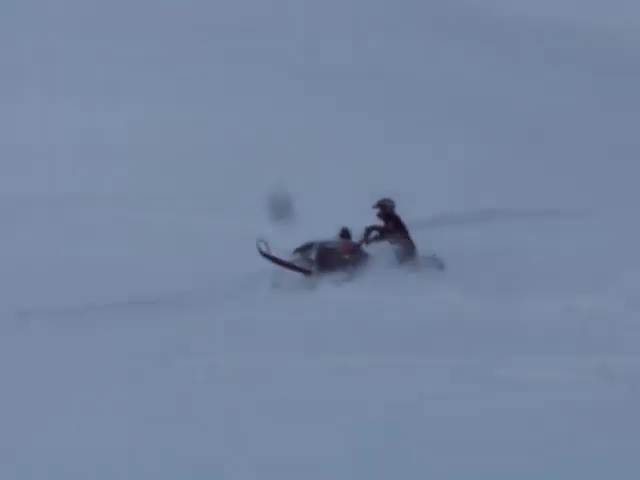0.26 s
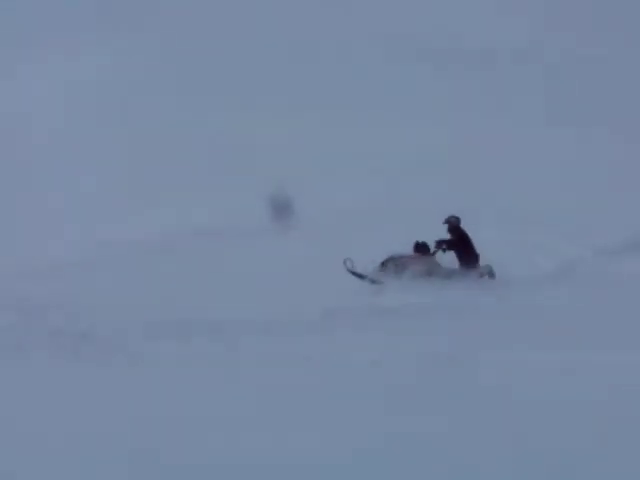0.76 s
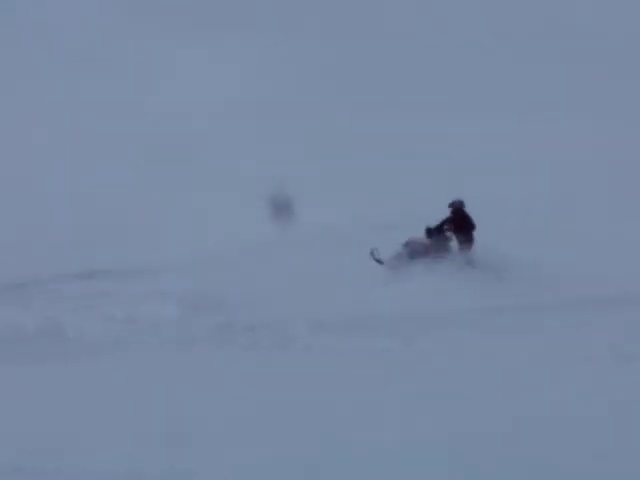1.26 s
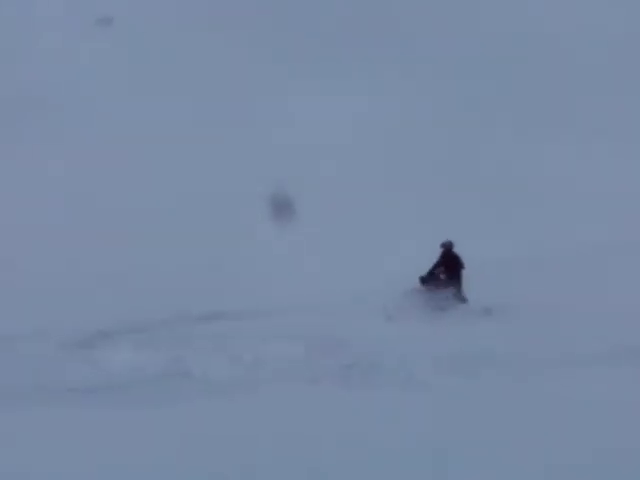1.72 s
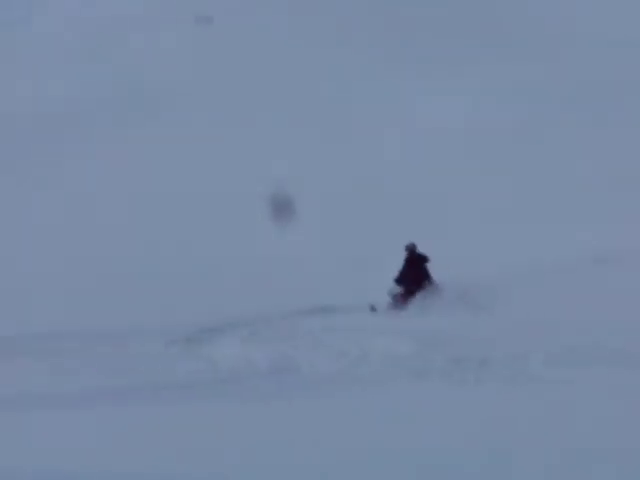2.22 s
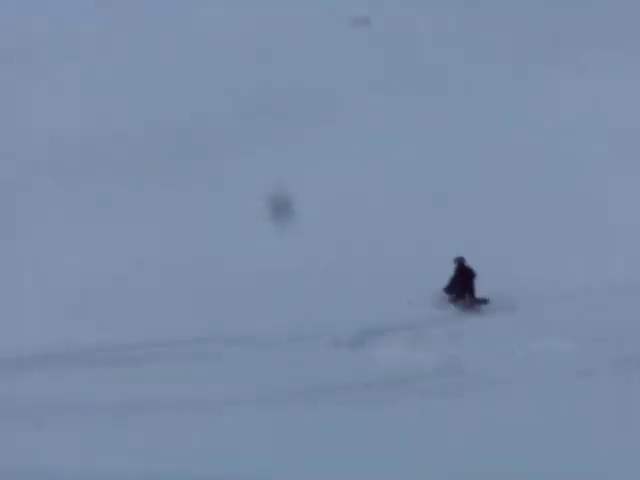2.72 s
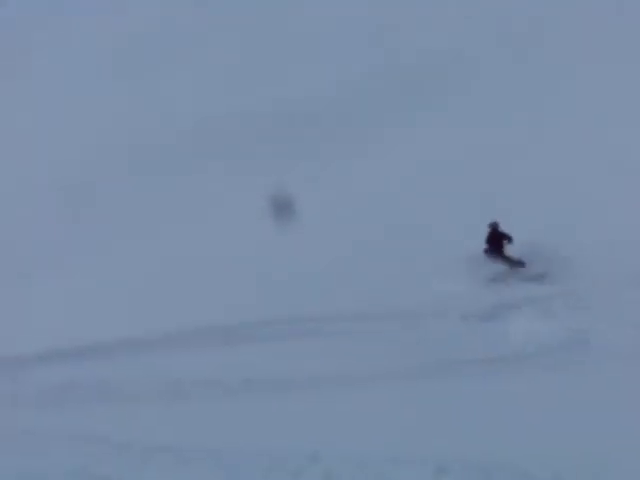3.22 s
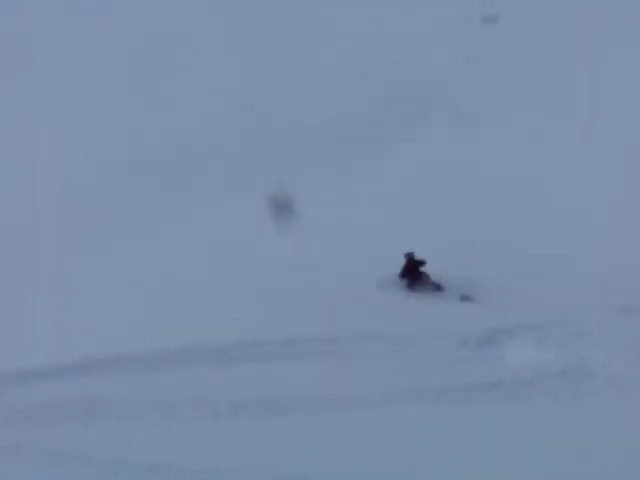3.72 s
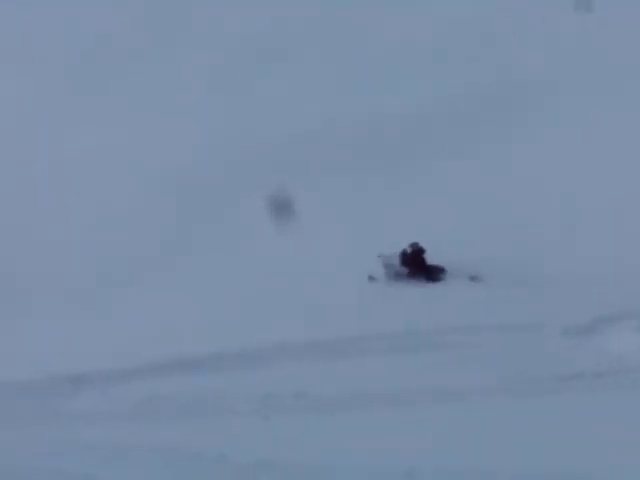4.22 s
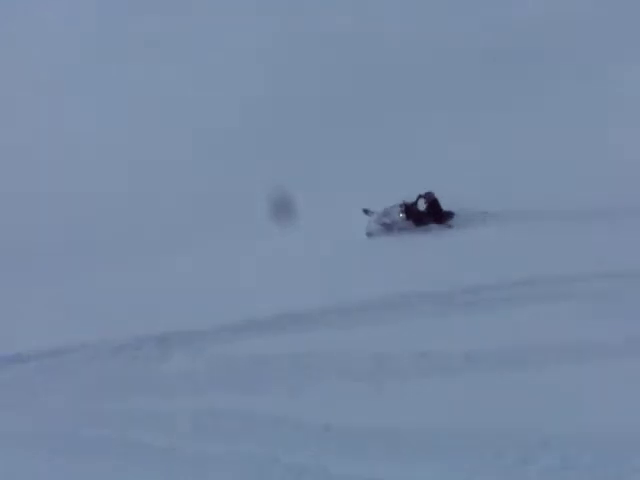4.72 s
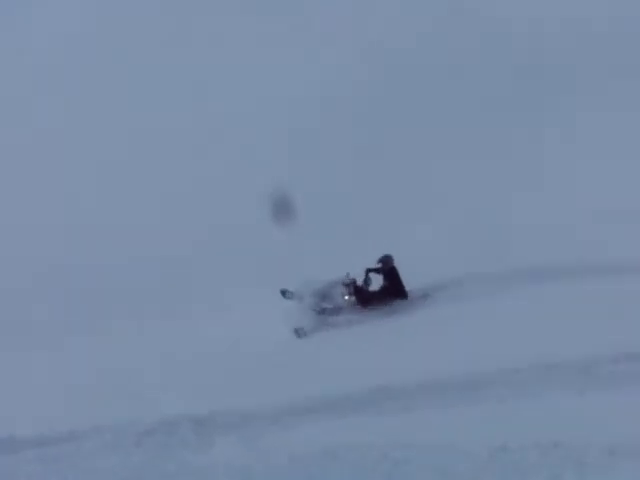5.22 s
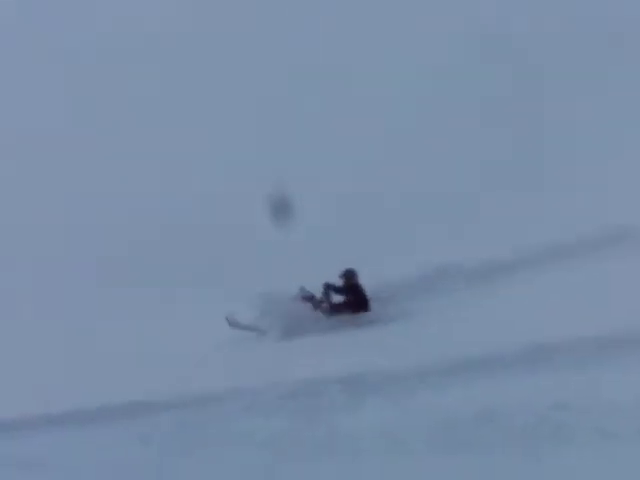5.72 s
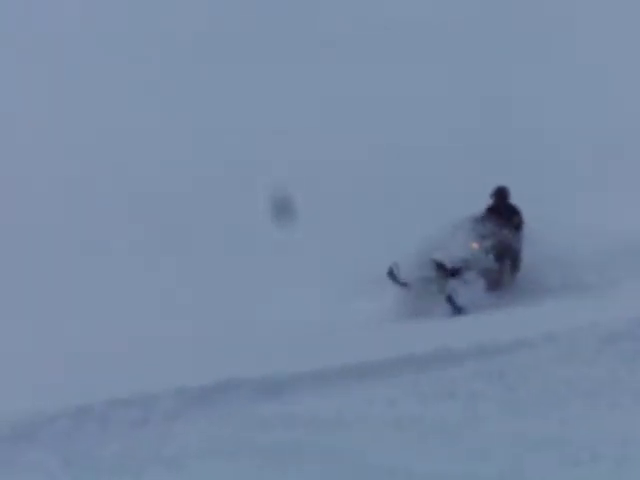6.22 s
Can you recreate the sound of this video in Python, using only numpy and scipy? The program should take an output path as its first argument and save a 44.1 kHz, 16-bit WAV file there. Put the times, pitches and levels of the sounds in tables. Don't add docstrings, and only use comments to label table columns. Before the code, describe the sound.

Raspy twin-cylinder sled engine screams and sags as the throttle opens and shuts, with track whine, hissing snow spray and light handling bumps outdoors.

```python
import sys
import numpy as np
from scipy import signal
from scipy.fft import rfft, irfft, next_fast_len
from scipy.io import wavfile
from scipy.ndimage import uniform_filter1d

SR = 44100
rng = np.random.default_rng(int(sys.argv[2]) if len(sys.argv) > 2 else 0)


def natural_amplitude(level_db):
    exponent = np.asarray(level_db, float) / 20
    return 10 ** exponent


def wav_out(sig):
    wavfile.write(sys.argv[1], SR, np.round(np.clip(np.atleast_2d(sig).T, -1, 1) * 32767).astype(np.int16))


N = 284886


def rms_one(x):
    return x / np.sqrt(np.mean(x ** 2) + 1e-20)


def in_time(rows):
    s, *columns = np.transpose(rows)
    return [np.interp(np.arange(N) / SR, s, c) for c in columns]


def at_hz(points, hz):
    point_hz, db = np.transpose(points)
    return np.interp(np.log(hz + 1), np.log(point_hz), db)


def drift(rate):
    r = np.exp(-128 * np.pi * rate / SR)
    slow = signal.lfilter([1], [1, -2 * r, r * r], rng.standard_normal(N // 64 + 1002))
    slow = slow[1000:]
    return np.interp(np.arange(N) / 64, np.arange(len(slow)), rms_one(slow))


def colour(x, db_of_hz):
    size = next_fast_len(N + 8192)
    hz = np.arange(size // 2 + 1) * SR / size
    cepstrum = irfft(db_of_hz(hz) * np.log(10) / 20, size)
    cepstrum[1:size // 2] *= 2
    cepstrum[size // 2 + 1:] = 0
    return irfft(rfft(x, size) * np.exp(rfft(cepstrum)), size)[..., :N]


def crank_hz():
    # start_s, aim_hz
    throttle = [(0, 121.9), (0.522, 131.4), (.7, 112.1), (0.899, 116), (1.0, 124.5), (1.15, 127.9),
                (1.419, 122.7), (1.7, 118.2), (1.99, 35.38), (2.18, 128), (2.3, 141.2), (2.409, 138.3),
                (2.635, 45.93), (2.91, 77.5), (2.98, 100.2), (3.07, 61.63), (3.22, 133.4), (3.35, 153.6),
                (3.55, 144), (3.72, 124.6), (3.89, 115.6), (4.06, 121.7), (4.2, 131.1), (4.595, 53.07),
                (4.751, 126), (5.05, 141.6), (5.31, 139), (5.66, 125.5), (5.84, 106.4), (6.1, 130),
                (6.21, 152.8), (6.375, 70)]
    start_hz, lag_s = 123.5, .35
    s, aim_hz = np.transpose(throttle)
    aim = aim_hz[np.searchsorted(s, np.arange(N) / SR, side="right").clip(1) - 1]
    keep = np.exp(-1 / (lag_s * SR))
    return signal.lfilter([1 - keep], [1, -keep], aim, zi=[keep * start_hz])[0]


def closed_throttle_db(speed_hz):
    delay_s, depth_db, fade_s = .025, 11, .02
    slowing = -uniform_filter1d(np.gradient(speed_hz) * SR, size=900)
    shut = np.clip((slowing - 55) / 35, 0, 1)
    shut_db = depth_db * np.minimum(shut, np.roll(shut, round(delay_s * SR)))
    return uniform_filter1d(shut_db, size=round(fade_s * SR))


def order_levels(speed_hz, off_pipe_hz, swing_db, facing):
    # order, level_db at mean effort, share of the effort's swing, facing_gain_db
    main_orders = [
        (2, -53, 0.21, 5),
        (4, -50, 0.33, 0.5),
        (6, -45, 1.44, 3),
        (8, -41.5, 1.2, -7),
        (10, -38.5, 0.78, -3.5),
        (14, -43.5, 1.34, 4),
        (7, -45, 1.4, -2.5),
    ]
    # start_s, length_s, order, level_db
    singing = [(0, .3, 6, -29.5), (0.596, 0.19, 6, -24), (1.564, 0.075, 6, -31), (1.905, 0.075, 6, -33.5),
               (2.528, 0.059, 6, -35), (3.573, 0.4, 6, -25), (3.997, .25, 6, -29.5), (4.276, 0.29, 6, -19),
               (4.95, 0.36, 6, -31), (5.799, 0.097, 6, -36), (6.27, 0.13, 6, -30), (0, 0.67, 7, -33.5),
               (0.596, 0.12, 7, -28), (0.802, .35, 7, -36), (2.547, 0.066, 7, -39), (3.601, .1, 7, -38),
               (5.396, 0.29, 7, -38.5), (1.351, 0.35, 10, -32.5), (5.547, 0.23, 8, -41.5),
               (5.986, 0.32, 10, -37), (1.256, .75, 7, -27.5), (4.354, 0.14, 7, -29),
               (5.154, .17, 7, -33.5), (1.274, 0.36, 8, -30.5), (2.222, 0.078, 8, -32.5),
               (4.338, 0.25, 8, -27), (4.745, 0.1, 8, -34), (5.2, 0.1, 8, -32.5), (6.321, 0.042, 8, -34),
               (0.22, 0.45, 10, -32), (0.8, 0.46, 10, -30), (4.243, 0.29, 10, -34), (4.905, .33, 10, -32.5),
               (0.83, 0.4, 14, -29), (1.208, 0.62, 14, -26), (4.298, 0.37, 14, -30.5),
               (5.093, 0.093, 14, -33), (5.95, .27, 6, -43), (4.162, 0.713, 4, -41.5),
               (5.29, 0.496, 2, -41.5)]
    t, out = np.arange(N) / SR, []
    for order, db, share, facing_db in main_orders:
        if order % 2:
            db_per_hz = .2
        else:
            db_per_hz = -.2 * (order > 2)
        pipe_db = db_per_hz * np.clip(off_pipe_hz, 0, 25.0)
        level = db + share * swing_db + facing_db * facing + pipe_db + 1.2 * drift(4.6)
        flutter_db = 1.67 * drift(8.0)
        for s, length, sung, sung_db in singing:
            if sung == order:
                outside_s = np.maximum(np.maximum(s - t, t - s - length), 0)
                level = np.maximum(level, sung_db - 150 * outside_s + flutter_db)
        out.append(level)
    return out


def howl(turns, anchors_db, odd_db, top_db, shut_db, idle_db, off_pipe_hz):
    # order, trim_db
    order_trim = [(1, -17.5), (3, -10), (5, -16), (9, -10), (11, -9), (12, -5), (13, -7.5), (15, -5),
                  (16, -6.5), (17, -4.5), (18, -7), (19, -9.5), (23, -7), (30, -8), (45, -16), (59, -23.5)]
    # peak_s, order, level_db, length_s
    streaks = [(0.39, 16, -29.5, 0.14), (0.55, 23, -27.5, 0.12), (.9, 23, -26, 0.084),
               (1.3, 15, -32, 0.069), (3.52, 13, -32.5, 0.045), (2.47, 15, -33, 0.1), (3.68, 16, -32, 0.12),
               (3.82, 22, -32, .09), (5.3, 14, -34, 0.16), (5.57, 12, -40, 0.4), (4.44, 5, -41.5, 0.38),
               (6.217, 16, -33, 0.083), (1.061, 3, -54, 0.26), (2.4, 11, -41.5, 0.11), (4.07, 3, -51, 0.26),
               (5.58, 5, -41, 0.28), (4.25, 5, -46, 0.11), (5.3, 16, -36, 0.18), (1.2, 16, -30, 0.087),
               (1.2, 13, -36, 0.21), (5.25, 6, -30.5, 0.1), (3.35, 8, -35.5, 0.054), (5.62, 8, -37.5, 0.11),
               (3.5, 15, -35.5, 0.06), (3.5, 9, -36.5, .12), (2.21, 10, -38.5, 0.18), (6.15, 10, -41, 0.15),
               (0.67, 4, -45, 1.55), (6.3, 12, -37.5, 0.07), (0.077, 16, -37.5, 0.16),
               (0.43, 9, -33.5, 0.18), (.5, 13, -38.5, 0.23), (0.48, 18, -33, 0.068), (.9, 15, -31, 0.16),
               (.95, 11, -34, 0.13), (0.51, 20, -29, 0.12), (1.45, 11, -32.5, 0.27), (2.4, 9, -38, 0.17),
               (3.42, 11, -37, 0.16), (4.15, 20, -33.5, .07), (4.25, 11, -35, .08), (1.7, 23, -36.5, 0.16),
               (5.95, 16, -45, .12), (6.05, 11, -43.5, .15), (5.86, 20, -36.5, 0.05),
               (5.85, 14, -37, 0.066), (5.45, 13, -41, .08), (5.8, 11, -36.5, 0.092), (3.64, 20, -32, 0.06),
               (2.6, 14, -34.5, 0.059),
               (0.049, 8, -42, 0.05), (0.519, 14, -39.5, 0.09), (0.65, 8, -36.0, 0.18),
              (0.69, 12, -40.5, 0.08), (0.93, 13, -36, 0.13), (1.15, 12, -40, 0.074),
              (1.164, 10, -39, 0.06), (1.31, 13, -37.5, 0.05), (1.553, 7, -36.0, 0.056),
              (1.618, 13, -37.5, 0.09), (1.81, 12, -42.5, 0.08), (2.04, 8, -39, 0.09),
              (2.27, 11, -46, 0.087), (2.29, 9, -45.6, 0.08), (2.43, 13, -43.5, 0.13), (2.46, 8, -44, 0.09),
              (2.59, 12, -48, 0.08), (3.85, 10, -38.5, 0.089), (4.08, 9, -40, 0.11), (4.33, 11, -40.3, 0.1),
              (4.398, 10, -33.5, 0.09), (4.49, 4, -41, 0.11), (4.51, 8, -33.5, 0.073),
              (4.51, 14, -37, 0.08), (4.84, 12, -47, 0.09), (4.869, 13, -39, 0.1), (5.02, 9, -44, 0.12),
              (5.21, 11, -39.2, 0.16), (5.208, 9, -44, 0.1), (5.279, 7, -41, 0.083), (5.33, 12, -37.5, 0.1),
              (5.46, 11, -46, 0.12), (5.45, 8, -44, 0.08), (5.53, 6, -36.5, 0.13), (5.8, 12, -44.0, 0.09),
              (5.87, 10, -46, 0.07), (6.22, 7, -45.8, 0.25), (6.27, 11, -43.5, 0.1),
              (6.418, 6, -45.5, 0.06),
               (0.04, 26, -41.5, 0.044), (0.11, 18, -43.5, 0.15), (0.16, 29, -38.7, 0.17),
              (0.192, 15, -37.5, 0.13), (0.19, 23, -39.5, 0.1), (0.19, 26, -41, 0.074),
              (0.362, 30, -37.5, 0.12), (0.391, 15, -36, 0.08), (0.471, 19, -36.5, 0.18),
              (0.51, 34, -38.5, 0.13), (0.48, 38, -38, 0.09), (0.5, 28, -40, 0.12),
              (0.652, 35, -34.5, 0.13), (0.682, 18, -37.4, 0.083), (0.69, 20, -39.5, 0.08),
              (0.752, 15, -42.5, 0.08), (0.88, 24, -40, 0.09), (0.891, 36, -39.5, 0.1),
              (0.929, 32, -36.5, 0.09), (1.04, 39, -32, 0.21), (0.98, 15, -37, 0.06),
              (1.01, 29, -34.5, 0.1), (1.15, 31, -33.5, 0.1), (1.22, 20, -37.3, 0.12),
              (1.32, 23, -37, 0.09), (1.43, 29, -38.9, 0.12), (1.42, 15, -34.5, 0.09),
              (1.44, 17, -41.5, 0.09), (1.599, 33, -40.5, 0.17), (1.691, 18, -34.5, 0.21),
              (1.68, 20, -42, 0.17), (1.651, 29, -39, 0.1), (1.71, 24, -41.3, 0.1),
              (1.837, 37, -35.5, 0.08), (1.89, 23, -41.5, 0.08), (1.971, 20, -44.5, 0.1),
              (2.25, 19, -49.5, 0.1), (2.436, 26, -38, 0.12), (2.51, 16, -39.5, 0.11),
              (2.67, 15, -45.5, 0.1), (3.39, 17, -43, 0.16), (3.44, 16, -45, 0.09), (3.8, 26, -41.4, 0.1),
              (3.85, 16, -45, 0.08), (4.301, 23, -41.5, 0.1), (4.372, 16, -38.5, 0.13),
              (4.521, 23, -41, 0.09), (4.901, 18, -37.5, 0.12), (5.0, 17, -43.5, 0.27),
              (5.02, 16, -42, 0.14),
               (.96, 43, -37, .08),
        (1.0, 44, -39, .1),
        (1.1, 42, -39, .07),
        (1.12, 35, -37, .05),
        (3.75, 14, -38, .12),
        (5.12, 24, -39, .08),
        (5.6, 12, -40, .12),
        (6.08, 20, -44, .19),
        (6.06, 15, -46, .14),
        (6.29, 15, -42, .12),
    ]
    # deepest_s, order, depth_db, length_s
    lulls = [(0.049, 23, 7.5, 0.05), (0.048, 25, 5.6, 0.056), (0.14, 14, 9.5, 0.099),
             (0.159, 27, 11.2, 0.08), (0.319, 8, 10.5, 0.17), (0.49, 17, 7.5, 0.12), (0.53, 18, 5.5, 0.07),
             (0.61, 11, 3.5, 0.12), (0.63, 22, 7, 0.07), (0.72, 10, 5, 0.1), (0.78, 25, 6, 0.18),
             (0.72, 17, 5.5, 0.08), (0.94, 21, 8, 0.2), (1.05, 25, 8, 0.14), (1.08, 15, 5, 0.08),
             (1.18, 7, 5.5, 0.08), (1.27, 16, 2, 0.07), (1.461, 6, 7.9, 0.16), (1.441, 10, 6, 0.1),
             (1.449, 9, 13.5, 0.13), (1.548, 16, 4, 0.14), (1.69, 23, 4, 0.07), (1.76, 15, 10.5, 0.16),
             (1.77, 17, 6, 0.19), (1.86, 11, 8.7, 0.13), (1.93, 12, 5, 0.07), (2.408, 10, 5.5, 0.062),
             (2.43, 18, 7, 0.07), (2.45, 24, 4.5, 0.1), (2.49, 23, 7, 0.1), (3.42, 11, 5, 0.06),
             (3.507, 6, 11.5, 0.07), (3.56, 13, 2.5, 0.06), (4.36, 12, 5.5, 0.18), (4.348, 13, 10.5, 0.12),
             (4.418, 17, 11.4, 0.2), (4.429, 15, 8.5, 0.19), (4.962, 6, 4.5, 0.066), (5.148, 12, 10, 0.11),
             (5.239, 14, 10, 0.064), (5.44, 10, 7.5, 0.094), (5.62, 8, 5.3, 0.11), (5.8, 11, 7, 0.08),
             (6.13, 10, 5, 0.09), (6.14, 16, 5.7, 0.06)]
    known, out, t = [2, 4, 6, 8, 10, 14, 18], np.zeros(N), np.arange(N) / SR
    levels = anchors_db + [top_db]
    jitter_turns = 0.0012 * (1 + .02 * np.maximum(off_pipe_hz, 0))
    wobble = jitter_turns * drift(27)
    contrast = np.clip(1 - .025 * off_pipe_hz, 0, 1)
    coarse = t[::64]
    for k in range(1, 60):
        place = np.interp(k, known, np.arange(7))
        below = min(int(place), 5)
        db = levels[below] + (place - below) * (levels[below + 1] - levels[below])
        if k % 2:
            db = db + np.clip(1.6 - abs(np.log2(k / 7)), 0, 1) * (odd_db - db)
        if k not in known[:6] + [7]:
            trim_db = np.interp(k, *np.transpose(order_trim))
            db = db + (contrast if 5 < k < 18 else 1) * trim_db
            waver_db = 2.2 * (1 + .03 * max(k - 16, 0))
            db = db + waver_db * drift(5 * (1 + max(k - 18, 0) / 8))
        open_db = -shut_db[::64] * (k > 4) - idle_db[::64] * (k > 2)
        lifts = 0
        for s, order, lift_db, length in streaks:
            if order == k:
                lifts = lifts + natural_amplitude(lift_db - 15.8 * ((coarse - s) / length) ** 2)
        for s, order, depth_db, length in lulls:
            if order == k:
                open_db = open_db - depth_db * np.exp(-((coarse - s) / length) ** 2)
        gain = np.interp(t, coarse, (natural_amplitude(db[::64]) + lifts) * natural_amplitude(open_db))
        rough = 0.0022 * k * (1 + max(k - 22, 0) / 50) * drift(28)
        out += gain * np.sin(2 * np.pi * (k * (turns + wobble) + rough + rng.random()))
    out += natural_amplitude(-64.5 + 3.9 * drift(2.4)) * np.sin(3 * np.pi * turns + 0.37 * drift(19))
    return np.sqrt(2) * out


def roar(turns, level_db, low_db, top_db):
    # pitch_hz, level_db per Hz
    roar_colour = [(190, -48.5), (320, -13.5), (441, -7), (484, -6.5), (546, -9.5), (667, -3.5), (723, -4),
                   (860, 3.5), (920, -2), (1750, 4), (2280, -3.5), (2830, -2), (5020, -11.5), (6920, -16.5),
                   (7800, -28), (10100, -58), (17200, -120)]
    # peak_s, lift_db, length_s
    sprays = [
        (0.614, 2, .05),
        (2.493, 4, 0.06),
        (3.464, 2, 0.11),
        (4.29, 0, 0.082),
        (6.35, 4, .04),
    ]
    puff = 1 + 0.11 * np.cos(4 * np.pi * turns) + 0.097 * np.cos(2 * np.pi * turns)
    white = rng.standard_normal((2, N))
    tinted = colour(white * puff, lambda hz: at_hz(roar_colour, hz) - 60 * (hz < 40))
    t = np.arange(N) / SR
    spray_db = sum(db * np.exp(-((t - s) / length) ** 2) for s, db, length in sprays)
    edges, out = 150 * 2 ** np.arange(0, 6.1, .5), 0
    for k, (low, high) in enumerate(zip(edges, edges[1:])):
        band_filter = signal.butter(2, [low, high], "band", fs=SR, output="sos")
        band = signal.sosfilt(band_filter, tinted[k % 2])
        octave = np.log2(low / 2400)
        tilt_db = low_db * np.clip(-octave, 0, 1) + (top_db + 5.0) * np.clip(octave, 0, 1)
        tilt_db = tilt_db + spray_db * np.clip(octave + 1.6, 0, 1)
        out = out + band * natural_amplitude(tilt_db + 1.1 * drift(4.3) + 1.28 * drift(27))
    return natural_amplitude(level_db + 4.5) * out / np.std(tinted)


def whine():
    # start_s, pitch_hz, level_db
    tooth_track = [
        (0, 1007, -40.5),
        (.2, 1037, -34.5),
        (.7, 1050, -32),
        (.9, 1017, -50.5),
        (1.2, 1011, -42),
        (1.35, 1047, -32.5),
        (1.7, 1096, -33),
        (1.95, 1068, -30),
        (2.09, 951, -65),
    ]
    hz, db = in_time(tooth_track)
    teeth = 2 * np.pi * (np.cumsum(hz) / SR + .05 * drift(26))
    tone = natural_amplitude(db + 3.2 * drift(13)) * np.sin(teeth)
    octave = natural_amplitude(db + 1 + 3.7 * drift(36)) * np.sin(2 * teeth)
    return tone + octave


def wind():
    # pitch_hz, level_db per Hz
    wind_colour = [(15, -8), (40, -11), (70, -4.5), (110, -6.5), (200, -8.5), (400, -29)]
    # peak_s, peak_db, length_s, left_minus_right_db
    gusts = [(0.197, -50, 0.28, -10.5), (0.805, -56, 0.36, 1), (1.605, -67.5, 0.45, -10),
             (2.71, -62.5, 0.22, 6), (3.402, -69, .15, 6), (3.75, -65.5, 0.081, -1), (4.553, -56, .15, -6),
             (4.918, -56, 0.46, -10), (5.32, -57, 0.082, -5), (5.973, -52.5, 0.051, -3),
             (6.31, -53.5, 0.33, -7.5)]
    t, sides = np.arange(N) / SR, np.array([[.5], [-.5]])
    gain = natural_amplitude(-65)
    for s, db, length, pan_db in gusts:
        gain = gain + natural_amplitude(db + pan_db * sides - 9 * ((t - s) / length) ** 2)
    shared, far, *own = rng.standard_normal((4, N))
    air = colour(np.array(own) + 1.4 * shared, lambda hz: at_hz(wind_colour, hz) - 30 * (hz > 900))
    rumble = signal.sosfilt(signal.butter(2, [90, 270], "band", fs=SR, output="sos"), far)
    return gain * natural_amplitude(1.8 * drift(15)) * air / np.std(air) + natural_amplitude(-56.0) * rms_one(rumble)


def knocks():
    # start_s, peak_db, left_minus_right_db, pitch_hz, t60_s
    short_rings = [(0.621, -37, 12, 377, 0.043), (1.357, -28.5, 3, 300, 0.034),
                   (2.025, -27, 2, 900, .08), (2.178, -30.5, 3, 250.2, 0.022),
                   (2.481, -29.5, 6, 306, 0.033), (3.38, -47, -13, 159.9, 0.037),
                   (3.583, -32, -5, 374, 0.039), (4.295, -17, 15, 930, 0.0051),
                   (4.285, -30, 12.5, 528, 0.071), (4.451, -26, -1, 250.6, 0.018),
                   (4.559, -25.5, -13, 149.8, 0.011), (5.944, -27, -7, 262.3, 0.023),
                   (5.985, -35, 3, 90.4, 0.057), (6.416, -26, -12, 120, 0.014)]
    out, t = np.zeros((2, N)), np.arange(2600) / SR
    for s, db, pan_db, hz, t60 in short_rings:
        ring = natural_amplitude(db - 60 * t / t60) * np.sin(2 * np.pi * hz * t)
        both = natural_amplitude(np.array([[.5], [-.5]]) * pan_db) * ring
        at = round(s * SR)
        out[:, at:at + len(t)] += both[:, :N - at]
    return out


def over_snow(near):
    dip_hz, width_hz, dip_db = 300, 30, -12
    return colour(near, lambda hz: dip_db * np.exp(-((hz - dip_hz) / width_hz) ** 2))


def scene():
    # start_s, level_db
    effort = [(0, -22.5), (.41, -20.5), (1.6, -21), (2.0, -21.5), (2.16, -31), (2.45, -26.5), (2.67, -26.5),
              (2.88, -39.5), (3.18, -39), (3.52, -26.5), (4.06, -27), (4.28, -21.5), (4.61, -23),
              (4.74, -28), (5.33, -25.5), (6.03, -33), (6.37, -27.5), (6.46, -33)]
    # start_s, share 0-1
    exhaust_side = [(0, 0.95), (.5, 0.49), (.8, 1.01), (1.2, 0.42), (2, 0.66), (2.2, 0.6), (2.65, 0.99),
                    (2.9, 0), (3.5, 0.6), (4.25, 0.04), (4.7, 0.1), (5.15, .05), (5.5, 0.53), (6.05, 0.2),
                    (6.4, 1)]
    speed_hz, (effort_db,), (facing,) = crank_hz(), in_time(effort), in_time(exhaust_side)
    turns = np.cumsum(speed_hz) / SR
    off_pipe_hz = 111 - speed_hz
    swing_db = effort_db + 27
    roar_db = effort_db - 4.5
    low_db = -5 - 0.3348 * swing_db
    top_db = -7 + 0.16 * swing_db + 8.5 * facing
    rasp_db = roar_db - 9 + 4 * facing
    idle_db = 1.2 * np.maximum(-35 - effort_db, 0)
    *anchors_db, odd_db = order_levels(speed_hz, off_pipe_hz, swing_db, facing)
    tones = howl(turns, anchors_db, odd_db, rasp_db, closed_throttle_db(speed_hz), idle_db, off_pipe_hz)
    noise = roar(turns, roar_db, low_db, top_db)
    scatter = natural_amplitude(-14) * np.roll(noise, 900) * [[1], [-1]]
    return over_snow(tones + noise + scatter + whine() + wind() + knocks())


def top_cut(x):
    return signal.sosfilt(signal.butter(12, 8680, fs=SR, output="sos"), x)


def record(dry):
    # pitch_hz, level_db
    port_colour = [(200, -1.5), (500, -5.5), (850, -1.5), (1020, -6), (1130, -16), (1280, -6), (2150, -8),
                   (2350, 1), (2680, 7), (3250, -0.5), (3950, -11), (5300, -14.5), (6400, -3), (7600, 2)]
    left = colour(dry[0], lambda hz: at_hz(port_colour, hz) / 2)
    right = colour(dry[1], lambda hz: -at_hz(port_colour, hz) / 2)
    cut = signal.sosfilt(signal.butter(6, 7700, fs=SR, output="sos"), [left, right])
    mix = 1.1 * np.tanh(cut / 1.1)
    return top_cut(mix)


dry = scene()
out = record(dry)
wav_out(out)
```